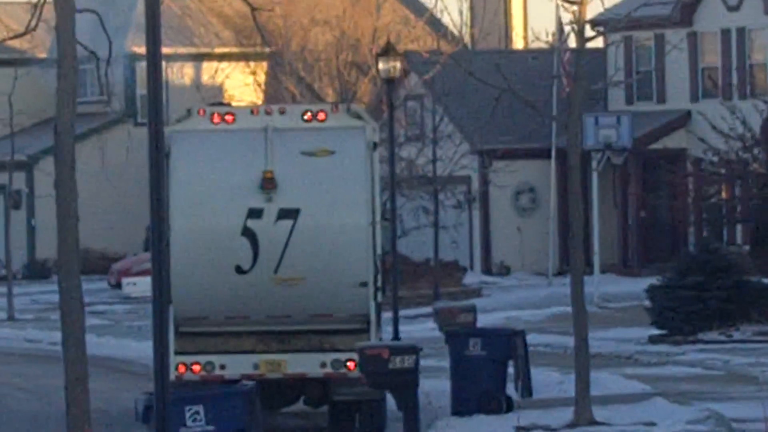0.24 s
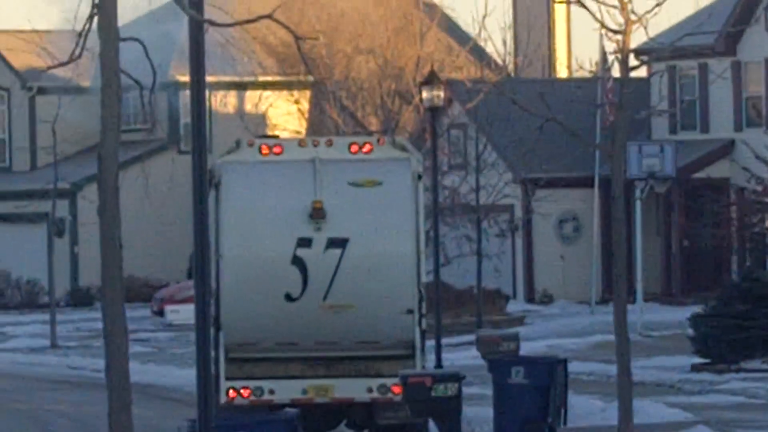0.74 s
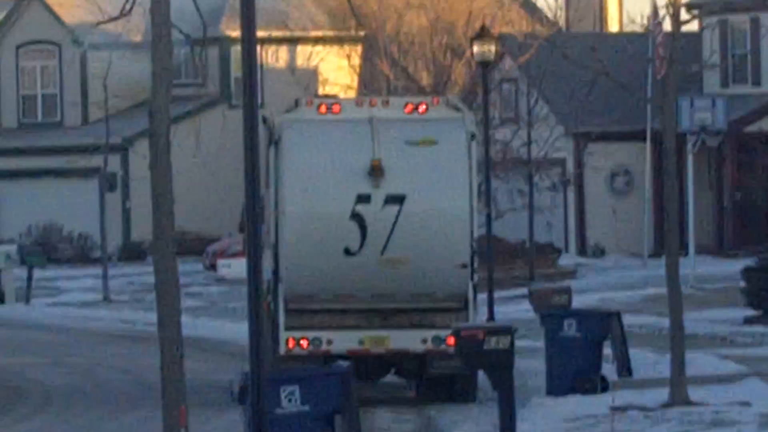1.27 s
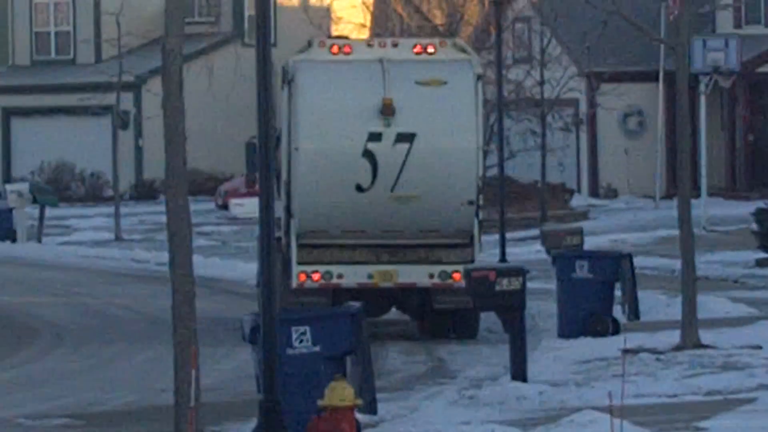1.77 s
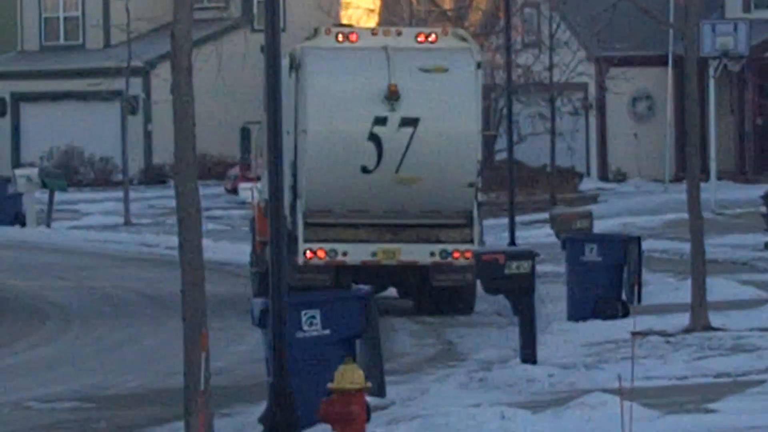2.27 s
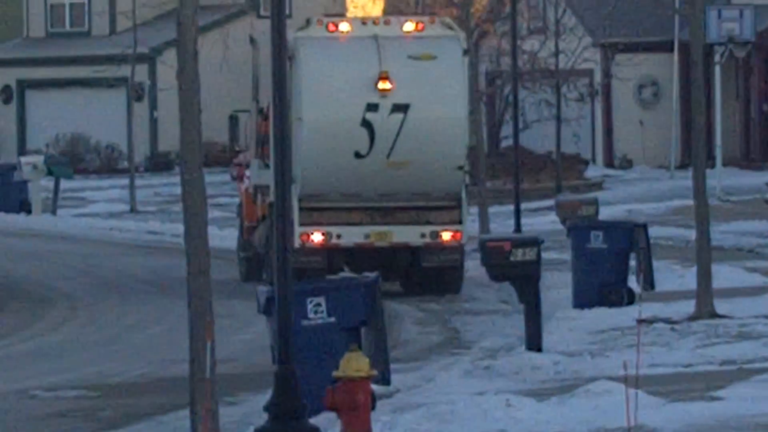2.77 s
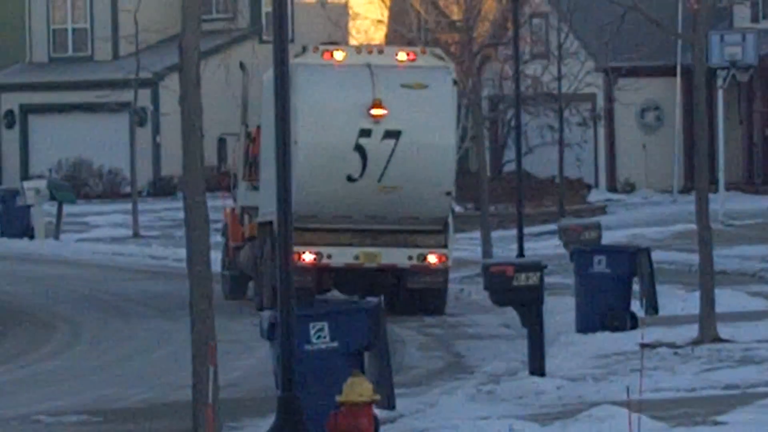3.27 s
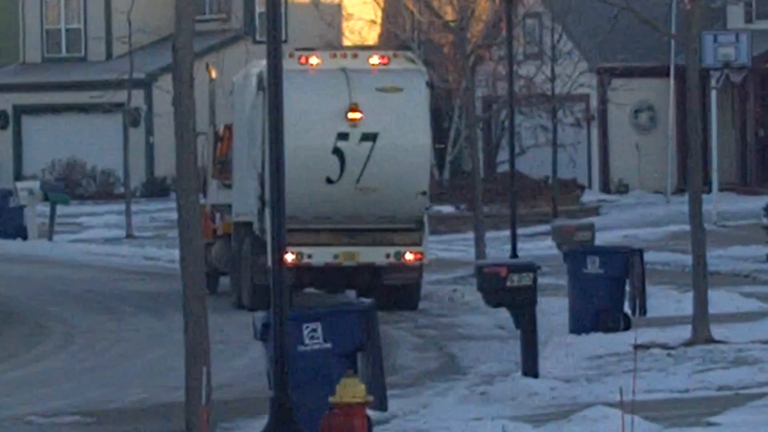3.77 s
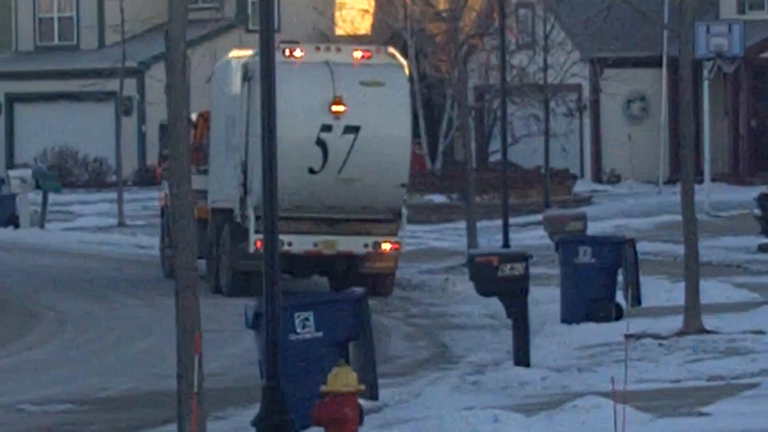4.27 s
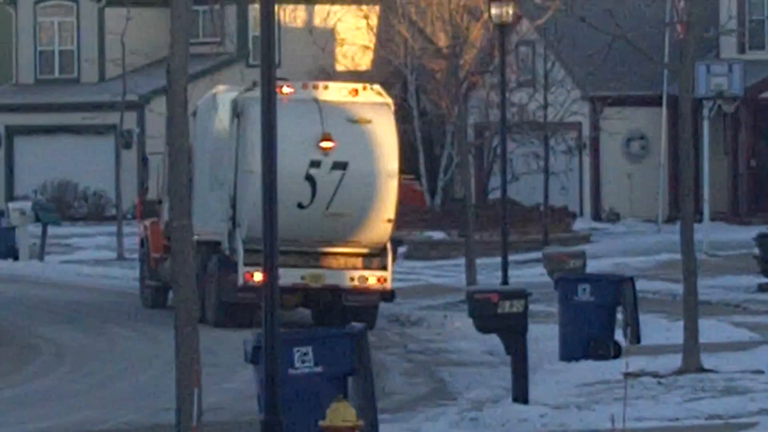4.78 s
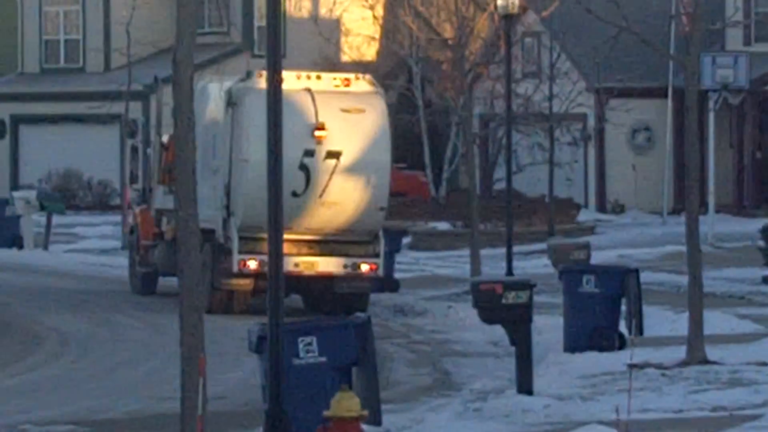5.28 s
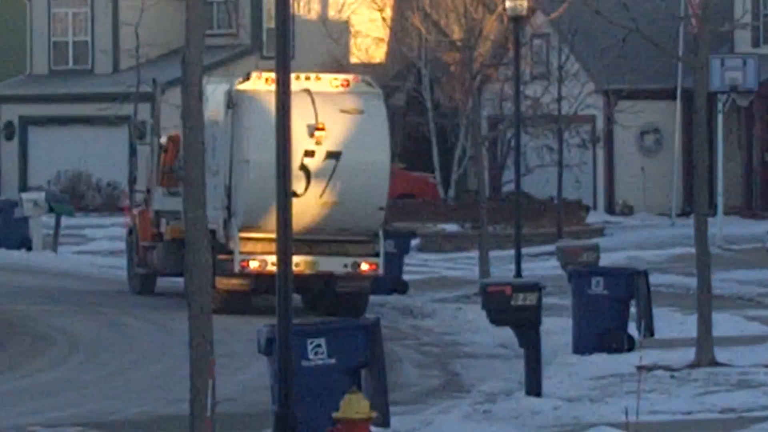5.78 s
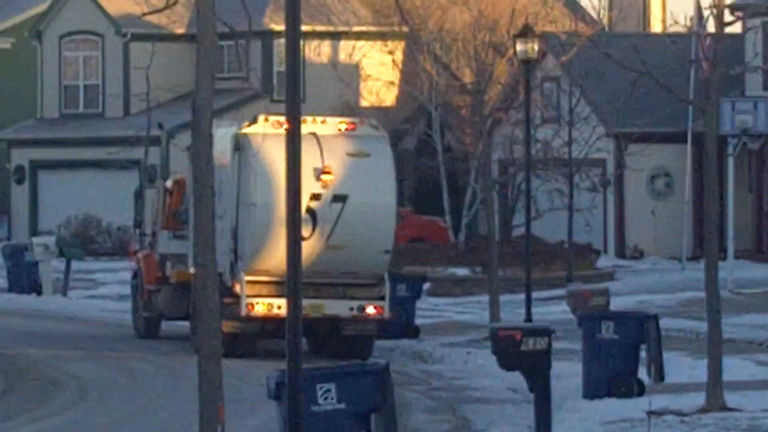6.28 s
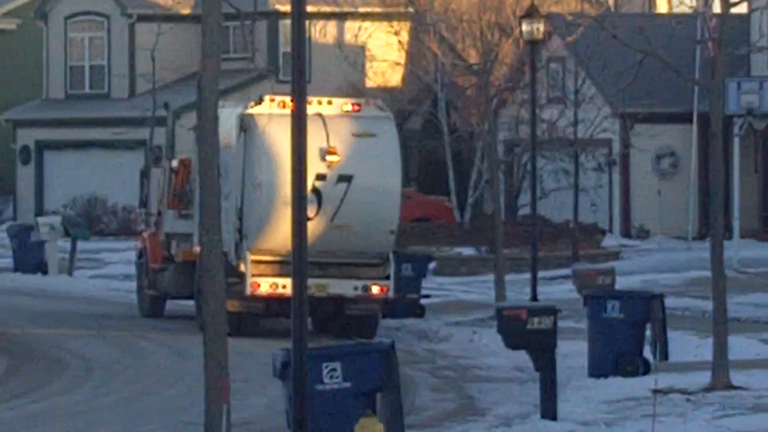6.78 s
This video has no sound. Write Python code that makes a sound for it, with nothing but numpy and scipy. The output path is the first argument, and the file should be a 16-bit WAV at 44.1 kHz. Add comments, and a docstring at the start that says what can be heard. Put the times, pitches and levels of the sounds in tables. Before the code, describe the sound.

A garbage truck drives away along a street of houses, heard from behind at some distance, centered, over a low town rumble and faint hiss. From 0 to about 2 s its six-cylinder diesel revs steadily upward: deep buzzing exhaust, uneven knocking clatter, gear whirr, rushing intake air and a faint, unsteady, rising turbo whistle. At about 2.5 s the throttle eases and revs slide down with a growl, lowest near 3.8 s, with a low driveline moan. Around 3.8 s brakes begin squealing; the strongest high metallic cries come at 4 to 4.8 s, overlapping and wavering. From 4.6 s the engine pulls again, revs rising until 6 s, then easing slightly, while thinner squeals and dry scrapes continue. At 6.35 s the hollow body booms softly over a bump; at 6.65 s a loose panel knocks. Short scattered house echoes surround the clatter and squeals.

```python
"""A diesel garbage truck pulls away down a street of houses, heard from some way behind, over a low town rumble.
Its six-cylinder engine revs up: sine overtones for the exhaust, knocked noise for clatter, a faint turbo whistle.
The revs drop back at the gear change with a growl; then dragging brakes squeal (gliding drum tones)
and scrape (gated noise) while the engine pulls again. Late on, the hollow body booms at a bump and a panel knocks.
Scattered house-front echoes follow everything but the exhaust and the town."""
import sys
import numpy as np
from scipy import signal
from scipy.fft import rfft, irfft
from scipy.io import wavfile
from scipy.ndimage import uniform_filter1d

SR = 44100
rng = np.random.default_rng(int(sys.argv[2]) if len(sys.argv) > 2 else 0)


def master_out(mix):
    """Clip the mix to full scale and print it as 16-bit PCM to the path in sys.argv[1]."""
    frames = np.transpose(np.atleast_2d(mix))
    ceiling = np.clip(frames, -1, 1)
    pcm = np.round(ceiling * 32767).astype(np.int16)
    wavfile.write(sys.argv[1], SR, pcm)


N = 310023
T = np.arange(N) / SR  # time [s]

# engine speed: (time [s], firing rate [Hz])
ENGINE_SPEED = [(0, 73.94), (.66, 86.3), (1.5, 105.9), (1.9, 110.5), (2.5, 106.9), (2.68, 93.2), (3.25, 77),
                (3.75, 63.3), (4.4, 67.33), (4.8, 81.67), (6, 95.7), (7.03, 87.1)]
# presses of the accelerator: (start [s], end [s], load [0-1], exhaust boom level [dB],
# exhaust overtone level [dB], turbo boost [0-1])
PEDAL_PRESSES = [(-.3, 2.0, 0.49, -28, -45.5, 0.76), (2.0, 2.46, 0.44, -41.5, -54.5, 0.77),
                 (4.64, 5.8, 0.69, -41.5, -81, 0.04), (5.8, 6.05, 0, -43.5, -73, .03),
                 (6.17, 6.46, 1, -53.5, -73, 0)]
# exhaust overtones; the halves come from unequal cylinders: (multiple of firing rate [1], level [dB])
EXHAUST_OVERTONES = [(.5, -3), (1.5, 0), (2, 0.5), (2.5, -11), (3, -14.5), (5, -16.5), (6, -19)]
# silencer and tailpipe resonances: (frequency [Hz], gain [dB])
TAILPIPE = [(40, -0.5), (60, 3), (110, 3), (142, 4), (168, -1), (190, -8.5), (220, -2), (290, -2),
            (400, -7), (540, 2)]
# growl of the third overtone while the revs drop: (frequency [Hz], gain [dB])
OVERRUN_COLOUR = [(185, -3), (218, -9.5), (246, 0), (266, -15)]
# firing knock of each cylinder: (level [dB])
CYLINDER_DB = np.array([5.0, -8, -9, -9, -0.5, -12.0])
# noise colour of the knocking block, also of the loose panel: (frequency [Hz], relative level [dB])
CLATTER_COLOUR = [(150, 1.5), (260, -8.5), (400, -11), (520, -4), (750, 3.5), (900, 0.5), (1060, -6.5),
                  (1330, -1), (1600, -16), (3000, -33.5), (8000, -66)]
# noise colour of the gears and fan: (frequency [Hz], relative level [dB])
GEAR_COLOUR = [(500, 4.5), (1500, -4.5), (2050, 4), (2600, -3), (3300, -5), (5000, -17), (10000, -31)]
# noise colour of the intake and charge air: (frequency [Hz], relative level [dB])
AIR_COLOUR = [(2500, -10.5), (4500, -2), (5700, 5.5), (7200, -2.5), (8500, -9.5), (10500, -24),
              (15000, -46)]
# moans and whirrs of driveline, hydraulics and brake linings:
# (start [s], length [s], first pitch [Hz], last pitch [Hz], level [dB], roughness [0-1])
MOAN_TONES = [(0, 2.03, 559.4, 547.6, -49.5, 0.45), (1.6, 0.51, 483, 466.4, -48.5, .03),
              (2.851, 1.04, 67.2, 72.44, -38.5, 0.11), (3.344, 0.54, 1980, 2090, -58, 0.44),
              (5.148, 0.19, 3610, 3560, -58.5, 0.42)]
# noise colour of the town: (frequency [Hz], relative level [dB])
TOWN_COLOUR = [(15, 1.5), (40, -4.5), (80, -1), (130, -12), (200, -16), (300, -24.5), (500, -27),
               (1500, -31), (5000, -58.5), (10000, -57), (15000, -58)]
# modes of the brake drums: {mode letter: pitch [Hz]}
DRUM_MODES = {"a": 3714, "b": 5200, "c": 6030, "d": 6320, "e": 6910, "f": 7500, "g": 7800, "h": 8120, "i":
              8300, "j": 8610, "k": 8950, "l": 9300, "m": 10200}
# brake squeals: (start [s], length [s], drum mode [letter], pitch slide [share], level [dB])
BRAKE_SQUEALS = [ (3.801, 0.17, "f", 0.039, -57.5), (3.824, 0.082, "d", 0.032, -50.5),
                 (3.826, .15, "m", 0.045, -72.5), (3.989, 0.28, "i", 0.0071, -44),
                 (4.032, 0.04, "c", 0.021, -43), (4.06, 0.046, "b", -0.0014, -57),
                 (4.089, 0.17, "d", -0.0073, -37.5), (4.23, 0.078, "b", 0.024, -53),
                 (4.231, .19, "i", -0.02, -41.5), (4.28, .14, "c", -0.013, -43),
                 (4.412, .41, "b", 0.029, -43), (4.43, 0.21, "e", -0.0074, -48.5),
                 (4.442, 0.15, "c", .008, -49), (4.482, 0.1, "m", -0.023, -64),
                 (4.551, 0.2, "d", -0.0064, -42), (4.776, .14, "g", 0.011, -54.5),
                 (4.89, 0.21, "l", .006, -65.5), (4.98, 0.087, "i", 0.016, -58),
                 (5.006, 0.15, "f", -0.011, -51.5), (5.145, 0.54, "k", .005, -67.5),
                 (5.246, 0.17, "g", .001, -51.5), (5.389, 0.09, "f", -.003, -56.5),
                 (5.603, .57, "g", 0.039, -50.5), (5.82, 0.15, "m", .01, -68.5),
                 (5.861, 0.93, "d", -0.013, -63), (5.89, 0.17, "b", -.001, -51),
                 (6.05, 0.23, "b", .005, -46.5), (6.31, .15, "b", .03, -53.5),
                 (6.134, 0.28, "j", -.004, -64), (6.183, 0.35, "i", -0.0078, -52.5),
                 (6.34, 0.65, "a", 0.0088, -60.5), (6.474, 0.51, "h", -0.034, -62.5)]
# dry rubbing of the shoes, a long faint drag and harder bites: (start [s], length [s], level [dB])
SHOE_SCRAPES = [(3.847, 3.3, -74.5), (4.683, .18, -62.5), (5.13, 0.1392, -58.5), (5.53, .03, -61),
                (6.33, 0.1345, -64), (6.78, .2, -66)]
# noise colour of the rubbed drums: (frequency [Hz], relative level [dB])
DRUM_COLOUR = [(2000, -3), (3600, 8.5), (5300, 9.5), (7500, 5.0), (10000, -2.5), (14000, -34)]
# noise colour of each microphone channel: (frequency [Hz], relative level [dB])
MIC_COLOUR = [(20, 0), (40, -4), (70, -12), (150, -36), (500, -57), (5000, -60), (9000, -48), (12000, -44)]

# engine parts off throttle at cruising speed, time 0:
# (level [dB], change under full load [dB], fading as the truck draws away [dB/s])
KNOCKING, GEARING, BREATHING = (-47, 6.3, 0.93), (-53.5, 3.4, 1.33), (-60, 0.63, 0.99)
COAST_OVERTONES = (-39, -27.5, 3.9)
CRUISE_HZ, SPEED_DB_PER_OCTAVE = 86, 5.5
PEDAL_S, BOOM_DELAY_S, BOOM_ATTACK_S, BOOM_SAG_DB_PER_S = 0.084, .13, 0.22, 3.5
# the growl's full level, and the fall in firing rate that brings it all out
OVERRUN_DB, OVERRUN_HZ_PER_S = -43.5, 26
BETWEEN_KNOCKS = .28  # steady share of the clatter noise
# whistle pitch at cruising speed, and the power of the revs that it follows
TURBO_HZ, TURBO_POWER = 8950, 1.38
TURBO_LAG_S, SPOOL_S = .14, 0.32
WHISTLE_DB, BOOST_AIR_DB = -77.5, -56.5
STREET_T60_S, STREET_DB, BLOCK_ECHO_DB = 0.48, -4.5, -10
SQUEAL_EDGE_S, SQUEAL_OCTAVE_DB = .05, -36
# a squeal of this level has the standard pitch unrest; each dB more adds this many dB of unrest
HARD_SQUEAL_DB, UNREST_PER_DB = -44.5, .28
JOLT_S, JOLT_DB = 6.36, -30.5
KNOCK_S, KNOCK_DB = 6.636, -42
NOTCH_HZ, NOTCH_WIDTH_HZ, TOP_HZ = 4230, 1500, 15250


def undb(db):
    """Decibels to gain."""
    return 10 ** (np.asarray(db) / 20)


def unit(x):
    """Scale to rms 1."""
    return x / np.sqrt(np.mean(x ** 2))


def response(hz, points):
    """Gain of a (frequency [Hz], level [dB]) outline at the given frequencies."""
    f, db = np.transpose(points)
    return undb(np.interp(np.log(hz + 1), np.log(f), db))


def colour(x, points):
    """Filter by a (frequency [Hz], level [dB]) outline, then scale to rms 1."""
    bins_hz = np.arange(N + 1) * SR / (2 * N)
    spectrum = rfft(x, 2 * N) * response(bins_hz, points)
    return unit(irfft(spectrum)[:N])


def noise():
    """White noise."""
    return rng.standard_normal(N)


def walk(rate):
    """Smooth random wander with about `rate` turns a second; spread 1."""
    k = max(int(SR / rate), 2)
    steps = np.repeat(noise()[:N // k + 1], k)
    return unit(uniform_filter1d(steps, k)[:N])


def gate(t, length, edge):
    """Soft-edged opening, passing its halfway point at t = 0 and t = `length`."""
    ramp = np.minimum(t, length - t) / edge + .5
    return np.sin(np.pi / 2 * np.clip(ramp, 0, 1)) ** 2


def lag(x, seconds):
    """Follow a control with some inertia."""
    keep = np.exp(-1 / (seconds * SR))
    return x[0] + signal.lfilter([1 - keep], [1, -keep], x - x[0])


def glide(start, length, first_hz, last_hz, bend, edge):
    """A sliding tone that swells towards its middle; its pitch is bent by a relative amount."""
    i = np.flatnonzero((T > start - edge) & (T < start + length + edge))
    t, out = T[i] - start, np.zeros(N)
    hz = np.interp(t, [0, length], [first_hz, last_hz]) * (1 + bend[i])
    swell = unit(np.hanning(len(i)) + .5)
    out[i] = swell * gate(t, length, edge) * np.sin(2 * np.pi * np.cumsum(hz) / SR)
    return out


def firing_rate():
    """Firing rate of the engine, following its speed curve."""
    return np.interp(T, *np.transpose(ENGINE_SPEED))


def pedal():
    """Engine load and turbo boost; the turbo spools up and down behind the pedal."""
    load, boost = 0, 0
    for start, end, press_load, _, _, press_boost in PEDAL_PRESSES:
        press = gate(T - start, end - start, PEDAL_S)
        load = load + press_load * press
        boost = boost + press_boost * press
    return load, lag(boost, SPOOL_S)


def loudness(part, hz, load):
    """Gain of an engine part: it grows with revs, shifts with load and fades as the truck draws away."""
    db, load_db, fade_db_per_s = part
    speed_db = SPEED_DB_PER_OCTAVE * np.log2(hz / CRUISE_HZ)
    return undb(db + speed_db + load_db * load - fade_db_per_s * T)


def exhaust(hz, phase, load, flutter_db=2.0, rough_db=3, smear=0.15):
    """The firing tone booms at each pull, overtones swell through pipe resonances, falling revs growl."""
    boom, overtones = 0, loudness(COAST_OVERTONES, hz, load)
    for start, end, _, boom_db, overtone_db, _ in PEDAL_PRESSES:
        pull = gate(T - start - BOOM_DELAY_S, end - start, BOOM_ATTACK_S)
        boom = boom + pull * undb(boom_db - BOOM_SAG_DB_PER_S * (T - start))
        overtones = overtones + pull * undb(overtone_db)
    out = np.sin(2 * np.pi * phase) * boom * undb(flutter_db * walk(25))

    for multiple, db in EXHAUST_OVERTONES:
        roughness = undb(db + rough_db * np.tanh(walk(9)))
        gain = overtones * roughness * response(multiple * hz, TAILPIPE)
        smeared_phase = multiple * phase + rng.random() + smear * walk(35)
        out = out + gain * np.sin(2 * np.pi * smeared_phase)

    rev_drop = -np.gradient(lag(firing_rate(), PEDAL_S)) * SR  # Hz per s
    overrun = np.clip(rev_drop / OVERRUN_HZ_PER_S, 0, 1) ** 2
    growl = response(3 * hz, OVERRUN_COLOUR) * np.sin(2 * np.pi * (3 * phase + smear * walk(35)))
    return np.sqrt(2) * (out + undb(OVERRUN_DB) * overrun * growl)


def block(hz, phase, load, scatter_db=1, ring=0.19, knock_db=-6.5):
    """Each firing knocks the block, two of the six cylinders harder; gears and fan rush on between."""
    firing = phase.astype(int)
    strength_db = knock_db + CYLINDER_DB[firing % 6] + scatter_db * noise()[firing]
    knock = undb(strength_db) * np.exp(-(phase % 1) / ring)  # ring is a share of the firing period
    clatter = colour(noise() * (BETWEEN_KNOCKS + knock), CLATTER_COLOUR)
    gears = colour(noise() * (1 + knock), GEAR_COLOUR)
    return clatter * loudness(KNOCKING, hz, load) + gears * loudness(GEARING, hz, load)


def turbo(hz, load, boost, waver=0.018, flicker_db=3):
    """The compressor blades whistle unsteadily, rising with the revs, over the rush of charge air."""
    whistle_hz = TURBO_HZ * (lag(hz, TURBO_LAG_S) / CRUISE_HZ) ** TURBO_POWER
    whistle = np.sin(2 * np.pi * np.cumsum(whistle_hz * (1 + waver * walk(500))) / SR)
    whistle_gain = np.sqrt(abs(boost)) * undb(WHISTLE_DB + flicker_db * walk(11))
    air_gain = np.hypot(loudness(BREATHING, hz, load), undb(BOOST_AIR_DB) * boost)
    air = colour(noise(), AIR_COLOUR) * air_gain * undb(.5 * walk(22))
    return whistle * whistle_gain + air


def moans(spread=0.1086):
    """Shafts, gears and the pump sing out briefly as the load changes."""
    out = 0
    for start, length, first_hz, last_hz, db, rough in MOAN_TONES:
        bend = spread * rough * walk(first_hz / 3)
        out = out + undb(db) * glide(start, length, first_hz, last_hz, bend, .12)
    return out


def street(x, echo_db):
    """Direct sound plus scattered, decaying echoes from the house fronts, thinned in the bass."""
    t = T[:SR]
    # cubing the noise makes a few echoes stand out
    echoes = rng.standard_normal(SR) ** 3 * undb(-60 * t / STREET_T60_S) * (t > .012)
    echoes = signal.sosfilt(signal.butter(2, 350, "high", fs=SR, output="sos"), echoes)
    echoes = echoes / np.linalg.norm(echoes)
    wet = undb(echo_db)
    return (x + wet * signal.fftconvolve(x, echoes)[:N]) / np.hypot(1, wet)


def town():
    """Low outdoor rumble, swelling a little, under a faint hiss."""
    return colour(noise(), TOWN_COLOUR) * undb(-39.5 + 2.1 * walk(7.9))


def squeals(wander=0.00099, jitter=0.0049, flutter_db=3.0):
    """Friction locks onto drum modes; harder squeals have rougher pitch, and each has a weak octave."""
    unrest = wander * walk(22) + jitter * walk(450)
    grip = undb(flutter_db * walk(35))
    out = 0
    for start, length, mode, slide, db in BRAKE_SQUEALS:
        shift = rng.integers(N)  # each squeal takes its own stretch of the unrest
        bend = undb(UNREST_PER_DB * (db - HARD_SQUEAL_DB)) * np.roll(unrest, shift)
        ends_hz = DRUM_MODES[mode] * (1 + slide * np.array([-.5, .5]))
        tone = glide(start, length, *ends_hz, bend, SQUEAL_EDGE_S)
        octave = glide(start, length, *2 * ends_hz, bend, SQUEAL_EDGE_S)
        out = out + undb(db) * np.roll(grip, shift) * (tone + undb(SQUEAL_OCTAVE_DB) * octave)
    return out


def scrapes():
    """Where the shoes rub without locking, the drums hiss."""
    pressure = sum(undb(db) * gate(T - start, length, 0.04) for start, length, db in SHOE_SCRAPES)
    return colour(noise(), DRUM_COLOUR) * pressure * undb(2.9 * walk(70))


def body(knock_decay_s=0.0065, jolt_s=0.038):
    """The hollow hopper booms as the wheels cross a bump, then a loose panel knocks."""
    boom = np.sin(2 * np.pi * 45 * T) + 0.76 * np.sin(2 * np.pi * 93 * T)
    jolt = undb(JOLT_DB) * np.exp(-((T - JOLT_S) / jolt_s) ** 2)
    blow = undb(KNOCK_DB) * (T > KNOCK_S) * np.exp(-abs(T - KNOCK_S) / knock_decay_s)
    return boom * jolt + blow * colour(noise(), CLATTER_COLOUR)


def scene():
    """The distant truck and the street arrive from straight ahead, alike in both channels."""
    hz = firing_rate() * (1 + .004 * walk(20))
    phase = np.cumsum(hz) / SR  # in firings
    load, boost = pedal()
    engine = exhaust(hz, phase, load) + street(block(hz, phase, load) + moans() + body(), BLOCK_ECHO_DB)
    # sounds from under the truck and its far side come more by way of the houses
    far_side = street(turbo(hz, load, boost) + squeals() + scrapes(), STREET_DB)
    return np.tile(engine + far_side + town(), (2, 1))


def record(dry):
    """The camcorder has a deep treble notch, a little noise per channel, a top cut and a steady offset."""
    b, a = signal.iirnotch(NOTCH_HZ, NOTCH_HZ / NOTCH_WIDTH_HZ, fs=SR)
    noise_db, offset = -60, .0218
    hiss = np.array([colour(noise(), MIC_COLOUR) for _ in range(2)])
    out = signal.lfilter(b, a, dry) + undb(noise_db) * hiss
    top_cut = signal.ellip(12, .2, 80, TOP_HZ, fs=SR, output="sos")
    return signal.sosfilt(top_cut, out) + offset


dry = scene()
out = record(dry)
master_out(out)
```